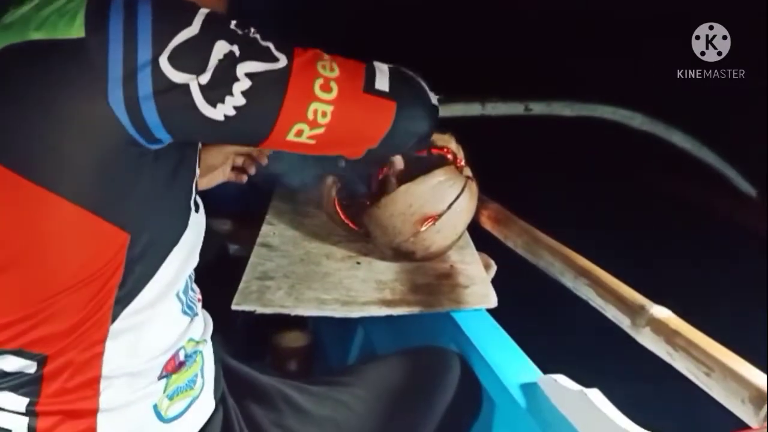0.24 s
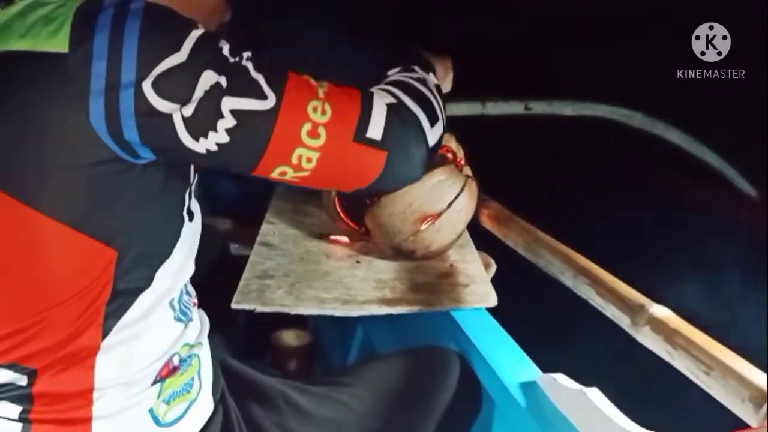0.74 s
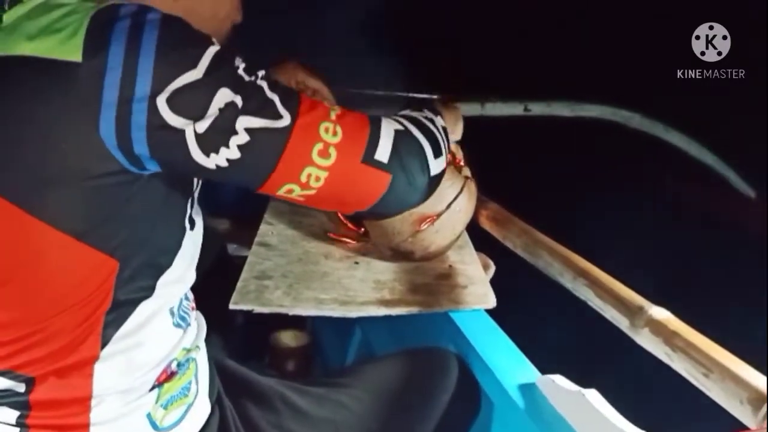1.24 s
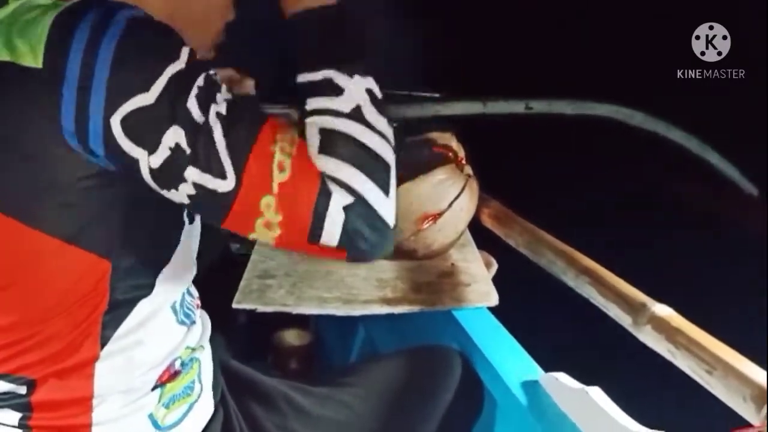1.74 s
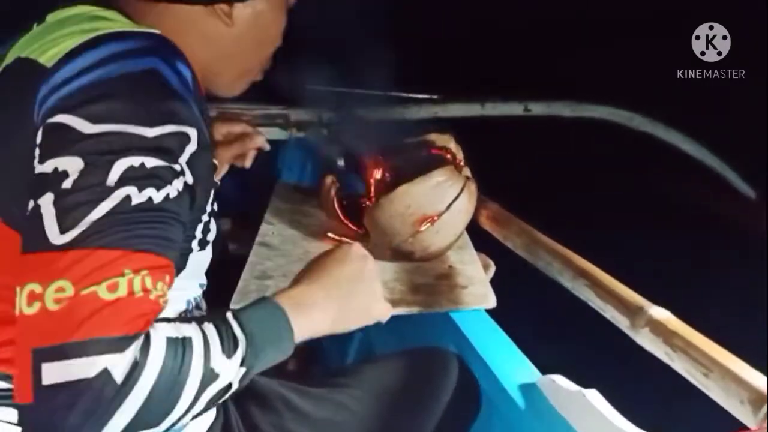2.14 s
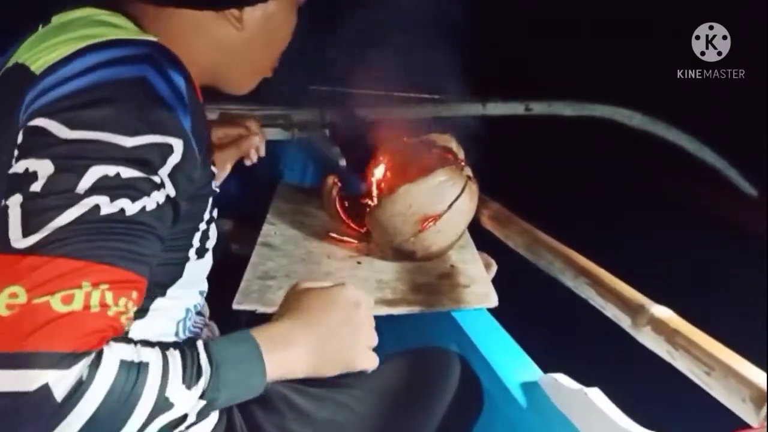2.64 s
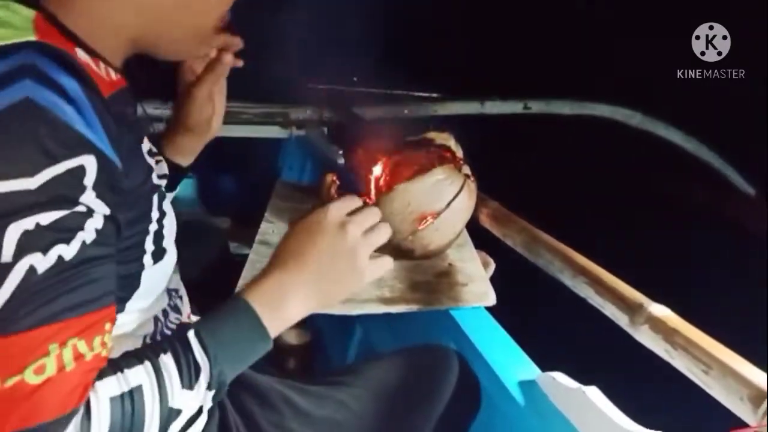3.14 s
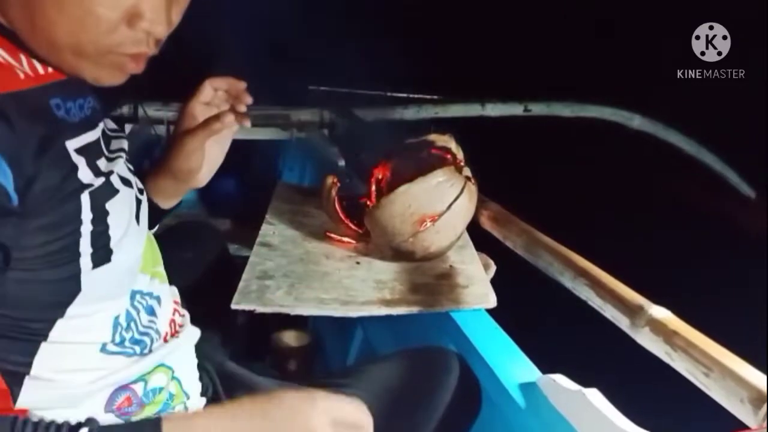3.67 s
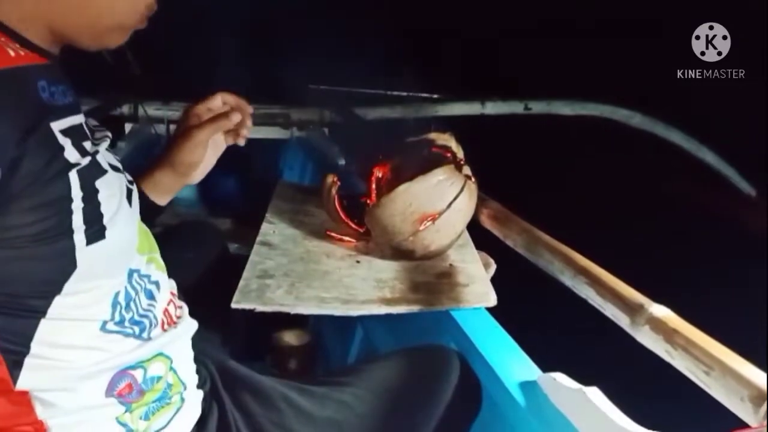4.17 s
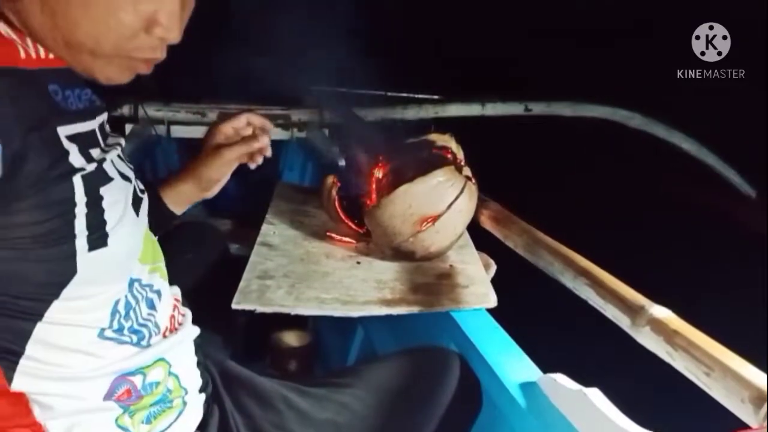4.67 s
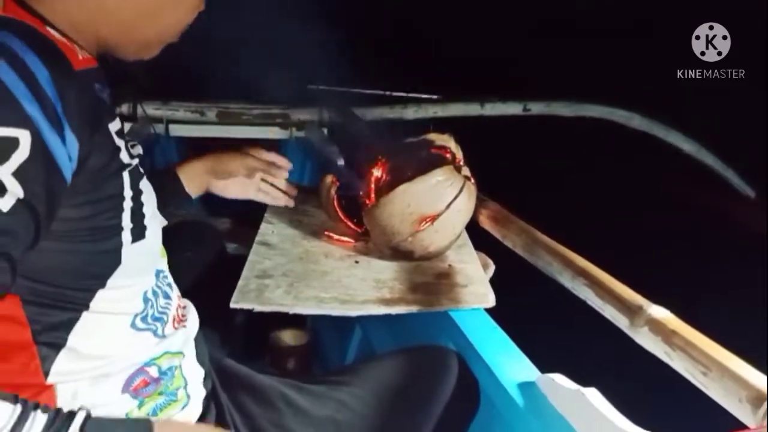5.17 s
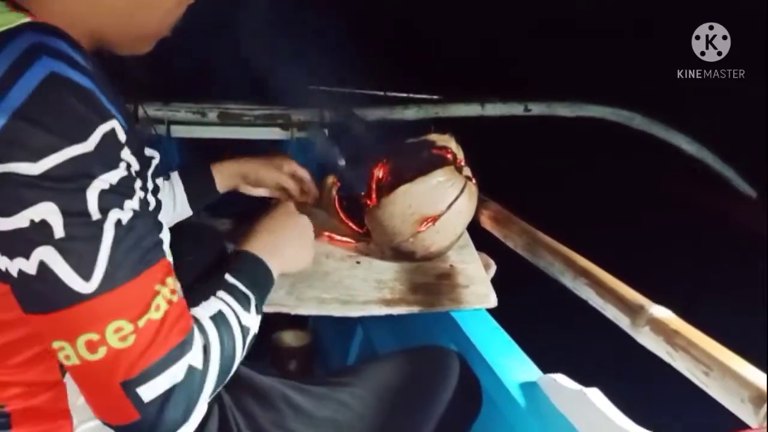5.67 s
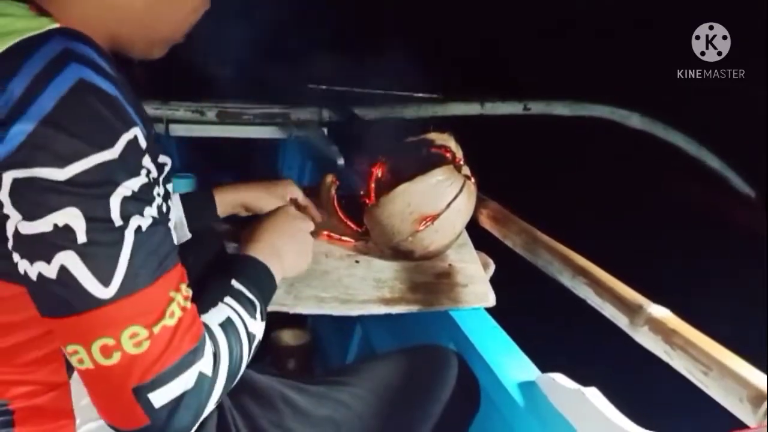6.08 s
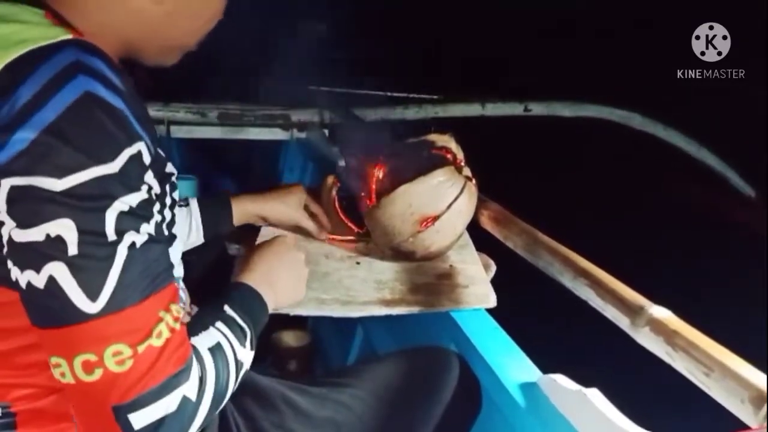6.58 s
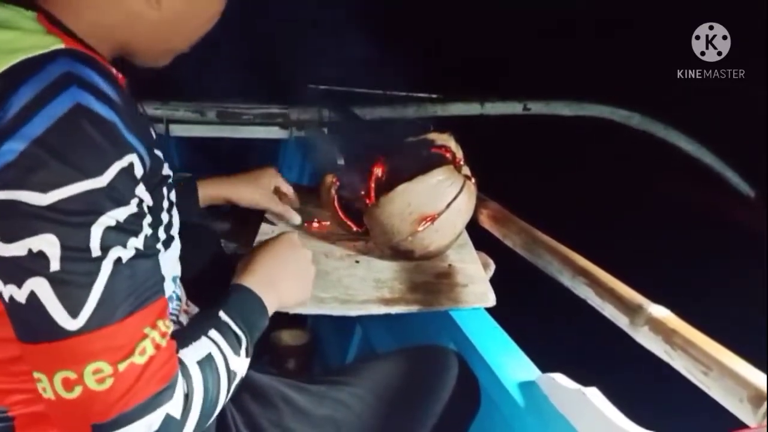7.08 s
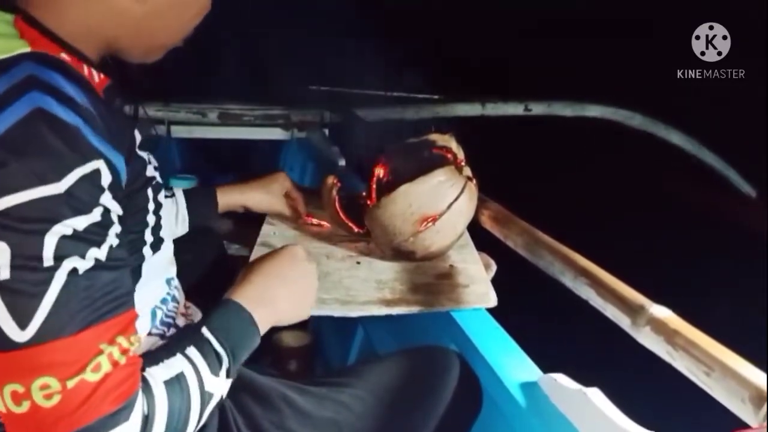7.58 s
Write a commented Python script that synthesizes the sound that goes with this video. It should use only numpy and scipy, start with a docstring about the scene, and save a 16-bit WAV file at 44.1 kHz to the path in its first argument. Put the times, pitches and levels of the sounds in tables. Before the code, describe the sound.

Glowing embers pop and crackle sharply at close range over a fizzing hiss, while small ripples lap a boat hull in a light breeze.

```python
"""Embers in a split coconut shell on a small boat's deck burn an arm's length from two microphone ports.
The shell's fractures excite its own resonances: pops with a damped crack, a hollow ring and a snap.
Rough bursts swell as grains, coals hiss as coloured noise and tick as impulses, and two sparks whistle
as gliding tones. Water plips as decaying bubble tones over a lapping wash and gurgle.
A light breeze rumbles as low noise, and its eddies push each port unevenly as short low oscillations."""
import sys
import numpy as np
from scipy import signal
from scipy.fft import rfft, irfft
from scipy.io import wavfile
from scipy.ndimage import uniform_filter1d

SR = 44100
rng = np.random.default_rng(int(sys.argv[2]) if len(sys.argv) > 2 else 0)


def pcm_store(signal):
    """Save signal as 16-bit PCM."""
    levels = np.round(np.clip(np.atleast_2d(signal), -1, 1) * 32767)
    wavfile.write(sys.argv[1], SR, levels.astype(np.int16).T)


N = 344854
TIME = np.arange(N) / SR


def undb(db):
    """Level law: decibels to amplitude gain."""
    return 10 ** (np.asarray(db) / 20)


def unit(x):
    """Normalisation: scale to rms 1."""
    return x / np.sqrt(np.mean(x ** 2))


def sides(pan_db):
    """Level panning: left and right gains of constant total power, from left minus right in dB."""
    gains = undb(np.array([pan_db, -pan_db]) / 2).reshape(2, -1)
    return gains / np.sqrt(np.mean(gains ** 2, axis=0))


def add(out, s, sound):
    """Superposition: mix a short sound in at time s."""
    i = max(int(s * SR), 0)
    out[:, i:i + sound.shape[-1]] += sound[..., :N - i]


def curves(table):
    """Linear interpolation: the columns of a table of (t/s, ..) rows, sample by sample."""
    s, *columns = np.transpose(table)
    return [np.interp(TIME, s, c) for c in columns]


def colour(x, points, size=4096):
    """Minimum-phase filtering: a causal response through (f/Hz, gain/dB) points."""
    hz, db = np.transpose(points)
    bin_hz = np.arange(size // 2 + 1) * SR / size
    gain = undb(np.interp(np.log(bin_hz + 1), np.log(hz), db))
    # folding the cepstrum onto positive times makes the response causal
    cepstrum = irfft(np.log(gain))
    cepstrum[1:size // 2] *= 2
    cepstrum[size // 2 + 1:] = 0
    response = irfft(np.exp(rfft(cepstrum)))
    return signal.fftconvolve(x, response[None], axes=1)[:, :N]


def band(x, edges_hz):
    """Damped resonance: a broad band-pass between two edges."""
    return signal.sosfilt(signal.butter(2, edges_hz, "bandpass", fs=SR, output="sos"), x)


def walk(rate):
    """Random modulation: levels held 1 / rate s and smoothed into ramps, at rms 1."""
    levels = rng.standard_normal(size=1024)
    held = levels[(TIME * rate).astype(int) % len(levels)]
    return unit(uniform_filter1d(held, int(SR / rate)))


def stereo_noise(apart, size=N):
    """Partial coherence: noise that both ports share, plus a part of their own."""
    shared = rng.standard_normal(size)
    own = rng.standard_normal((2, size))
    return (shared + apart * own) / np.hypot(1, apart)


def fade(t, t60):
    """Exponential decay: down 60 dB after t60 seconds."""
    return np.exp(-np.log(1000) * t / t60)


def boat(x, deck_s=.0078, deck_db=-21, near_db=-14, near_t60=0.052, far_db=-26, far_t60=0.26, size=9000):
    """Reflection and scattering: the deck returns one echo, the hull and the cook a short tail."""
    t = np.arange(size) / SR
    response = np.zeros((2, size))
    onset = 1 - np.exp(-(t / 0.0062) ** 2)
    for db, t60 in ((near_db, near_t60), (far_db, far_t60)):
        tail = stereo_noise(1, size=size) * fade(t, t60) * onset
        response += undb(db) * unit(tail) / np.sqrt(size)
    response[:, 0] += 1  # direct sound
    response[:, int(deck_s * SR)] += undb(deck_db)
    return signal.fftconvolve(x, response, axes=1)[:, :N]


# a gust is one main eddy and a scatter of weaker ones, on a swell of rumble (dB against the main eddy)
EDDIES_PER_S, MINOR_EDDY_DB, SWELL_DB = 35, -4.5, -15
# gusts that hit a port: (peak t/s, length/s, relative level/dB, eddy f/Hz, left minus right/dB)
GUST_EVENTS = [(0.514, 0.17, -39, 107, -20), (1.1, 0.12, -41, 88, -26), (1.373, .07, -43, 130, 5),
               (1.934, 0.031, -26, 103, -34), (2.219, 0.15, -36.5, 104, -26), (3.158, 0.011, -38, 88, 28),
               (4.311, 0.019, -34.5, 220, -20), (4.346, 0.065, -30, 107, -24.5),
               (4.39, 0.029, -29, 171, -20), (4.479, 0.034, -36.5, 88, 22), (4.552, 0.031, -29, 165.4, -22),
               (4.637, 0.052, -27.5, 102, 1.5), (4.963, 0.035, -27.5, 86.5, 25),
               (5.16, 0.029, -36, 164, -31), (5.254, 0.11, -36.5, 79.7, -6), (5.446, 0.028, -24.5, 104, 16),
               (5.527, 0.043, -28, 148, -11), (5.599, 0.077, -33, 95, 5), (6.29, 0.062, -32, 89.6, -4),
               (6.318, 0.027, -30, 134, -25), (6.432, 0.029, -32.5, 102.3, 17),
               (6.499, 0.078, -41.5, 83, -20), (6.659, 0.088, -33, 77.6, -22), (7.07, .12, -39, 90, 22.5),
               (7.197, 0.048, -34, 95.2, 27), (7.287, 0.054, -24.5, 102, 35), (7.492, 0.064, -31, 93, 26),
               (7.727, .02, -31, 88.4, -31)]


def gusts(eddy_cycles=0.76, eddy_db=4.5, size=4000):
    """Turbulent pressure: eddies push a port to and fro; returns them and the swell of rumble."""
    eddies, swell = np.zeros((2, N)), np.zeros((2, N))
    t = (np.arange(size) - size // 2) / SR
    for s, length, db, hz, side_db in GUST_EVENTS:
        peak = undb(db + eddy_db) * sides(side_db) / np.sqrt(2)
        swell += undb(SWELL_DB) * peak * np.exp(-np.minimum((2 * (TIME - s) / length) ** 2, 20))
        minor_count = int(EDDIES_PER_S * length)
        minor = [(s + length * (u - .5), MINOR_EDDY_DB) for u in rng.random(minor_count)]
        window = 1 / np.cosh(np.clip(hz * t / eddy_cycles * 2, -20, 20))
        for when, weaker_db in [(s, 0)] + minor:
            # each port starts at its own random phase
            push = np.cos(2 * np.pi * (hz * t + rng.random((2, 1)))) * window
            add(eddies, when + t[0], push * peak * undb(weaker_db))
    return eddies, swell


# the steady breeze between gusts: (t/s, relative rumble level/dB)
BREEZE_LEVEL = [(0, -66.5), (.7, -58.5), (1.7, -61.5), (2.6, -55.5), (3.1, -65.5), (4.2, -56.5),
                (5.5, -57.5), (6.5, -54.5), (6.9, -61.5), (7.8, -56)]
# spectral shape of the rumble: (f/Hz, relative gain/dB)
RUMBLE_SPECTRUM = [(20, -29.5), (40, -11.5), (70, 2), (100, -4), (160, -6.5), (250, -24), (400, -28),
                   (900, -55.5), (3000, -65)]


def breeze(rumble_db=5.0, gust_db=3.0):
    """Wind noise: incoherent low-frequency pressure at each port, swelling with each gust."""
    level_db, = curves(BREEZE_LEVEL)
    unsteady_db = gust_db * np.array([walk(9), walk(9)])
    eddies, swell = gusts()
    strength = undb(level_db + rumble_db + unsteady_db) + swell
    rumble = unit(colour(rng.standard_normal((2, N)), RUMBLE_SPECTRUM))
    return eddies + rumble * strength


def bubble(hz, t60, rise=0.065):
    """Bubble resonance: a decaying tone that rises in pitch as the bubble nears the surface."""
    t = np.arange(int(t60 * SR)) / SR
    onset = 1 - np.exp(-t * hz / 2)
    cycles = hz * t * (1 + rise * t / t60 / 2)
    return onset * fade(t, t60) * np.sin(2 * np.pi * cycles)


def gurgle(low_hz=420, high_hz=1400, count=1300):
    """Random superposition: a dense crowd of bubbles of all sizes merges into a gurgle."""
    out = np.zeros((2, N))
    for when, width, strength, side in rng.random((count, 4)):
        hz = low_hz * (high_hz / low_hz) ** width
        tone = bubble(hz, 45 / hz)  # every size decays over 45 cycles
        add(out, when * N / SR, tone * undb(10 * strength) * sides(8 * (side - .5)))
    return unit(out)


# distinct bubbles at the hull: (t/s, starting f/Hz, relative level/dB, t60/s)
HULL_BUBBLES = [(1.11, 2600, -22.5, 0.01), (1.115, 1420, -34.5, 0.032), (1.35, 223, -38, 0.1),
                (1.385, 355, -38, 0.035), (2.108, 1085, -37, 0.084), (2.106, 670, -35.5, 0.049),
                (5.049, 304.6, -42.5, 0.12), (5.585, 378, -37, 0.084), (5.952, 1850, -41, 0.05),
                (7.176, 1483, -44.5, 0.06), (7.578, 2870, -32.5, 0.014)]


def plips():
    """Bubble resonance: single bubbles ring at the hull, their loudness roughened at random."""
    out = np.zeros((2, N))
    for s, hz, db, t60 in HULL_BUBBLES:
        add(out, s, bubble(hz, t60) * undb(db))
    return boat(out * (1 + .35 * walk(500)))


# how hard the water laps: (t/s, relative level/dB)
LAPPING_LEVEL = [(0.0, -62), (1.0, -64), (1.13, -63.5), (1.87, -60), (2.0, -58.5), (2.9, -65.5),
                 (3.07, -69), (3.31, -73.5), (3.68, -66.5), (3.85, -70), (5.64, -65), (6.14, -68.5),
                 (6.77, -66.5), (7.14, -71), (7.54, -65), (7.82, -62.5)]
# spectral shape of the wash: (f/Hz, relative gain/dB)
WASH_SPECTRUM = [(100, -9.5), (250, 2.5), (400, -5.5), (680, -1.5), (950, -4), (1300, -9.5), (2200, -11.5),
                 (5000, -31)]


def water(wash_db=2.0):
    """Modulated noise: ripples lap the hull as a wash and a fainter gurgle, with plips on top."""
    lap_db, = curves(LAPPING_LEVEL)
    wash = unit(colour(stereo_noise(1.0) * undb(3.7 * walk(31)), WASH_SPECTRUM))
    return (wash + gurgle() / 2) * undb(lap_db + wash_db) + plips()


# each pop bares fresh char, so the fizz flares by up to FLARE_DB and sinks back
FLARE_DB, FLARE_T60_S = 5, 0.35


def flare():
    """Saturating relaxation: how freshly the char is broken, 0-1, up at each pop, then sinking."""
    breaks = np.bincount([int(s * SR) for s, *_ in POP_EVENTS], minlength=N)
    freshness = signal.lfilter([1], [1, -fade(1 / SR, FLARE_T60_S)], breaks)
    return np.tanh(freshness)


# spectral shape of the fizz: (f/Hz, relative gain/dB)
FIZZ_SPECTRUM = [(400, -8.5), (700, -4), (1200, -8.5), (2000, -0.5), (2700, 2.5), (3300, -6), (5000, -10),
                 (6800, -4.5), (7600, -9.5), (9000, -26), (12500, -30.5), (15000, -21)]


def hiss(flicker_db=4.0):
    """Jet noise: gas escaping the glowing char hisses as coloured, flickering noise."""
    return unit(colour(stereo_noise(1.0) * undb(flicker_db * walk(35)), FIZZ_SPECTRUM))


def ticks(spread_db=7, ceiling_db=27, t60=0.0038, count=620, size=300):
    """Shot noise: many tiny fractures at random times, most faint and a few standing out."""
    when, strength, side = rng.random((count, 3)).T
    sizes = undb(np.minimum(-spread_db * np.log(1 - strength), ceiling_db))
    clicks = np.zeros((2, N))
    clicks[:, (when * N).astype(int)] = sizes * sides(9 * (side - .5))
    grain = 0.28 * stereo_noise(1, size=size) * fade(np.arange(size) / SR, t60)
    grain[:, 0] += 1
    return unit(signal.fftconvolve(clicks, grain, axes=1)[:, :N])


# the sizes of char flake that tick: (low f/Hz, high f/Hz, relative level/dB)
FLAKE_BANDS = [(600, 5800, 4), (2180, 7900, 1), (5870, 7520, 3), (3000, 18000, -7.5)]


def crackle(clump_db=3):
    """Filtered shot noise: each size of flake ticks in its own band, in irregular clumps."""
    flakes = np.zeros((2, N))
    for low_hz, high_hz, db in FLAKE_BANDS:
        flakes += unit(band(ticks(), (low_hz, high_hz))) * undb(db)
    return unit(boat(flakes * undb(clump_db * walk(15))))


# how hard the coals fizz: (t/s, relative level/dB)
FIZZ_LEVEL = [(0.0, -59.5), (0.54, -62.5), (0.72, -62), (1.24, -60.5), (1.87, -64.5), (2.09, -59),
              (2.26, -62), (2.48, -61.5), (3.16, -73), (3.63, -67.5), (4.53, -69), (4.99, -63.5),
              (5.1, -74), (5.34, -70), (5.53, -60.5), (6.27, -67.5), (7.08, -65.5), (7.82, -66)]


def coals(hiss_db=-0.03):
    """Amplitude modulation: hiss and crackle follow one level, which flares after each pop."""
    fizz_db = curves(FIZZ_LEVEL)[0] + FLARE_DB * flare()
    return (hiss() + crackle()) * undb(fizz_db + hiss_db)


# sparks that fly off: (t/s, length/s, starting f/Hz, final f/Hz, relative level/dB)
SPARK_EVENTS = [(2.682, 0.033, 8200, 6600, -48.5), (4.931, .052, 6310, 7280, -44.5)]


def sparks(flutter=.018, size=4000):
    """Frequency modulation: a burning chip whistles on its own jet of gas, gliding and fluttering."""
    out = np.zeros((2, N))
    for s, length, start_hz, end_hz, db in SPARK_EVENTS:
        age = np.minimum(np.arange(size) / (length * SR), 1)
        wobble = unit(uniform_filter1d(rng.standard_normal(size), size=30))
        hz = (start_hz + (end_hz - start_hz) * age) * (1 + flutter * wobble)
        envelope = np.sin(np.pi * age) * (1 - age / 2)
        add(out, s, undb(db) * envelope * np.sin(2 * np.pi * np.cumsum(hz) / SR))
    return out


# the bands that ring besides a pop's own crack: (low f/Hz, high f/Hz)
HOLLOW, SNAP, TOP = (591, 1017), (6460, 7440), (8500, 14100)
# rough grainy bursts: crumbling char, sizzles, spits and small ticks
# (t/s, length/s, relative level/dB, hollow ring relative to grit/dB)
GRAINY_BURSTS = [(0.12, 0.046, -49.5, 1), (0.194, 0.087, -49, -13), (.305, .17, -49, -17),
                 (0.786, 0.024, -42.5, -7), (1.111, 0.02, -45, -20), (1.502, 0.24, -50.5, -4.5),
                 (1.86, 0.065, -50, -8), (1.959, .2, -50, -2), (2.878, 0.049, -61, 4),
                 (3.069, 0.067, -55, -14), (4.247, 0.05, -55.5, 4.5), (4.924, 0.51, -60, -3),
                 (5.286, 0.15, -52.5, -6), (6.543, .1, -57.5, -4), (6.868, 0.0072, -49.5, 2),
                 (6.924, 0.058, -62.5, 8), (7.042, 0.016, -50.5, -10.5), (7.27, 0.088, -57.5, 5),
                 (7.424, 0.13, -53.5, -25)]


def grainy_bursts(grit_hz=(1700, 4200), grain_spread=2.0, burst_db=2, size=14000):
    """Granular noise: a rough burst swells quickly as separate grains and dies away."""
    out = np.zeros((2, N))
    for s, length, db, hollow_db in GRAINY_BURSTS:
        age = 5 * np.arange(size) / (length * SR)
        # grains of very uneven size, on average 40 per burst length, over a trace of steady noise
        strikes = rng.random(size) < 40 / (length * SR)
        sizes = strikes * np.exp(2 * grain_spread * (rng.random(size) - 1))
        grains = stereo_noise(.6, size=size) * (.012 + sizes)
        burst = unit(band(grains, grit_hz))
        burst = burst + unit(band(grains, HOLLOW)) * undb(hollow_db)
        burst = burst + unit(band(grains, SNAP)) * undb(-5.0)
        swell = (age * np.exp(1 - age)) ** 2
        add(out, s, burst * swell * undb(db + burst_db))
    return out


# all pops come from the one shell: left minus right, and its scatter from pop to pop
POP_PAN_DB, POP_PAN_SCATTER_DB = 1.3, 2
# pops of the shell: (t/s, relative crack level/dB, crack f/Hz,
# hollow ring relative to crack/dB, relative snap level/dB)
POP_EVENTS = [(0.214, -41.5, 2550, -4, 2), (0.3626, -42.5, 2500, -23, 5.5), (0.4012, -37, 2860, -5, -1),
              (.4097, -35.5, 3400, -6, -13), (0.4193, -34, 2700, 5.5, -18), (.5239, -43, 2600, -28, -6),
              (0.5717, -21, 3300, -8.5, -2), (0.621, -27.5, 2730, -7, -3.5), (0.653, -36.5, 2800, -2, -2),
              (0.6744, -24, 3120, -5, 0), (0.9139, -27.5, 2450, -9.5, -4.5), (0.9365, -35, 3080, -9, -6),
              (1.2248, -32.5, 3100, -18, 0.5), (1.2572, -39, 3230, -13, 2), (1.414, -34, 2830, -6, -2.5),
              (1.654, -22, 2430, -10, -9), (1.8958, -22, 2760, -10.5, -27), (1.9004, -36, 2300, 9, 10),
              (1.9114, -29, 2660, 4, 3.5), (1.934, -26.5, 3020, 2, -8), (2.0842, -39, 2310, -20, 6),
              (2.0948, -45, 2400, -18, 18.5), (2.1029, -32.5, 2840, -17, 1.5),
              (2.2397, -29.5, 3430, -13.5, -3.5), (2.2974, -38.5, 3000, -15, -3.5),
              (2.4103, -42, 2650, -1, 2), (2.501, -16.5, 3500, 3.5, -5.5), (2.6314, -20, 3730, -1, -11),
              (2.662, -19.5, 3500, 1.5, -5), (2.6727, -15, 2880, 1, -17), (2.84, -49, 2500, -10, -18),
              (2.987, -56.5, 2700, 2, 8.5), (3.044, -52.5, 2764, -2, 8.5), (3.3638, -44, 2500, -24, -11),
              (3.525, -33, 3010, -2, -16), (3.534, -33, 2400, -3, 1.5), (3.5912, -44.5, 3700, -9, 1.5),
              (3.8003, -47, 2900, -12, -7.5), (3.8301, -49.5, 3100, -11, -2),
              (4.1676, -49.5, 4400, -4.5, 7.5), (4.6009, -38.5, 2684, -2.5, -25),
              (4.7796, -44, 3430, -25, -12.5), (4.823, -42, 3017, -1, -7), (4.848, -51, 3410, 2, -3.5),
              (4.9198, -41.5, 2600, 0, 1), (4.9241, -16, 2780, -2, -10), (5.444, -35.5, 3810, -5, -5),
              (5.4788, -40, 2578, -11, -18), (5.5774, -37.5, 3000, -15, 2), (5.6635, -42, 2447, -5, -14),
              (5.7931, -28.5, 4100, -4, -5), (5.9201, -16, 2500, -4.5, -8), (6.0525, -48, 2400, -2, -6),
              (6.0785, -26.5, 2700, -10.5, -5.5), (6.2162, -54, 2904, 4, 4.5),
              (6.4902, -37, 2677, -1, -6.5), (6.7181, -46.5, 4100, -3, -5), (6.9458, -55, 3460, 1, 5),
              (7.2632, -50.5, 2050, 14.5, -0.5), (7.3689, -51, 2700, 7.5, 15),
              (7.5878, -43, 2680, -7.5, -25), (7.659, -30, 2600, 4, 2.5), (7.7004, -27, 2900, 0, -13),
              (7.7825, -40, 2200, -1, -10)]


def pops(splinter=0.15, splinter_t60=0.027, weak_db=-36, weak_slope=0.83, crack_width=1.437, second=0.29,
         tear=1.0, pop_db=0.0, bright_db=-4.5, top_db=-13, lead_s=.0002, size=700):
    """Impulse excitation: a double fracture and splinters ring the hollow, the broken piece and a snap."""
    out, t = np.zeros((2, N)), np.arange(size) / SR
    window = .004 * SR  # the crack's energy is referred to 4 ms
    for s, db, hz, hollow_db, snap_db in POP_EVENTS:
        pan_db = POP_PAN_DB + POP_PAN_SCATTER_DB * rng.standard_normal()
        # weak pops are mostly splinters and spitting gas, strong ones mostly the sharp double break
        spray_db = weak_slope * (weak_db - db - max(hollow_db, 0))
        spray = splinter * undb(spray_db) * fade(t, splinter_t60)
        force = spray * stereo_noise(0.18, size=size)
        # the shell gives way in two steps a fraction of a millisecond apart, so every pop has its own colour
        force[:, 0] += 1
        force[:, rng.integers(9, 20)] += second
        # the break takes a moment to run through the shell, which roughens its treble
        rough = tear * fade(t, 0.0092) * stereo_noise(0.97, size=size)
        crack = unit(band(force + rough / 2, (hz / crack_width, hz * crack_width)))
        hollow = unit(band(force, HOLLOW)) * undb(hollow_db)
        snap = unit(band(force + rough, SNAP)) * undb(bright_db)
        snap = snap + unit(band(force + 2 * rough, TOP)) * undb(top_db)
        pop = hollow - crack + snap * undb(snap_db)
        add(out, s - lead_s, pop * np.sqrt(window / size) * undb(db + pop_db) * sides(pan_db))
    return out


# colour of the pops and grainy bursts at the ports: (f/Hz, gain/dB)
FIRE_SPECTRUM = [(100, 9.5), (260, 11.5), (370, 2), (700, -1), (1150, -3.5), (1550, 3), (2000, -0.5),
                 (2650, 1), (4200, -5), (5500, 4), (6900, -2), (8400, 1), (10500, -9), (12500, -13),
                 (15000, 3), (16200, -12)]


def scene():
    """Arrival-time difference: the fire reaches the left port one sample later; water and breeze add."""
    shell = colour(pops() + grainy_bursts(), FIRE_SPECTRUM)
    fire = boat(shell + sparks()) + coals()
    fire[0] = np.roll(fire[0], shift=1)
    return fire + water() + breeze()


TOP_HZ = 15700


def record(dry):
    """Saturation and band limiting: flatten what exceeds full scale, then cut above TOP_HZ."""
    clipped = np.clip(dry, -1, 1)
    return signal.sosfilt(signal.ellip(10, .2, 90, TOP_HZ, fs=SR, output="sos"), clipped)


dry = scene()
out = record(dry)
pcm_store(out)
```